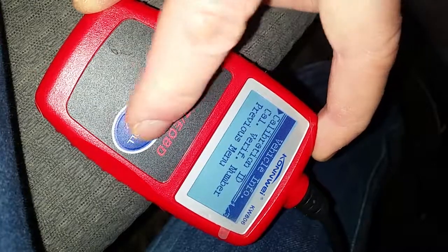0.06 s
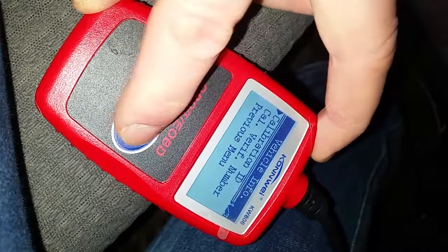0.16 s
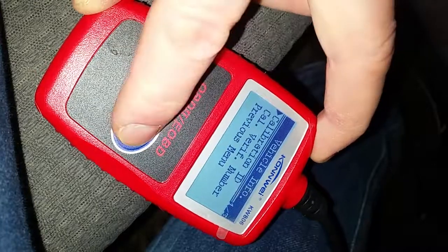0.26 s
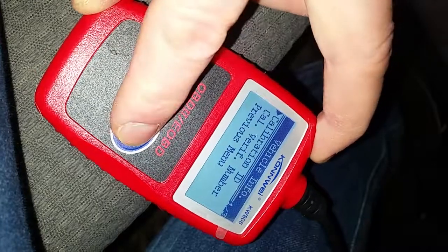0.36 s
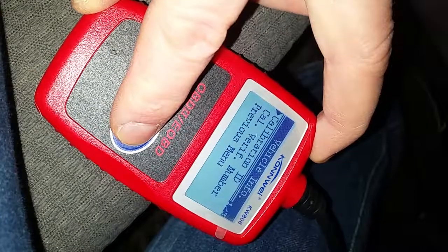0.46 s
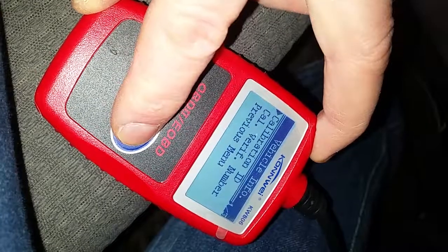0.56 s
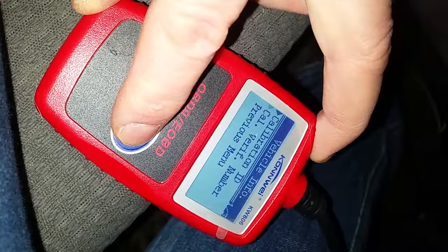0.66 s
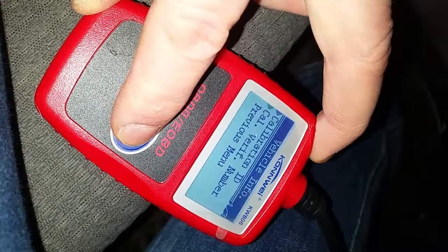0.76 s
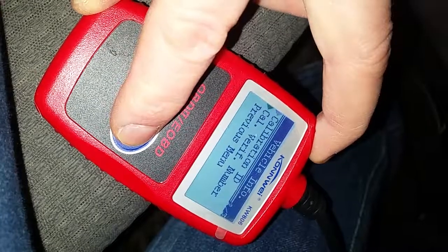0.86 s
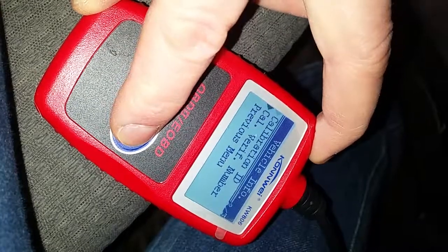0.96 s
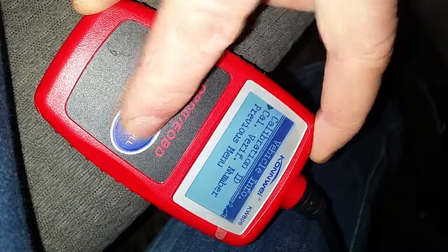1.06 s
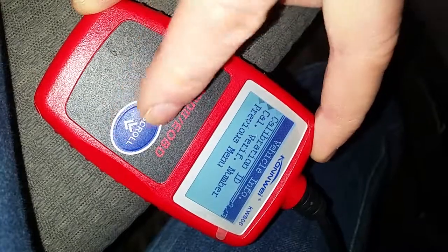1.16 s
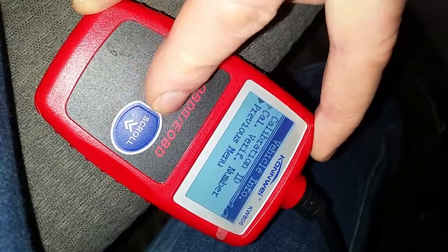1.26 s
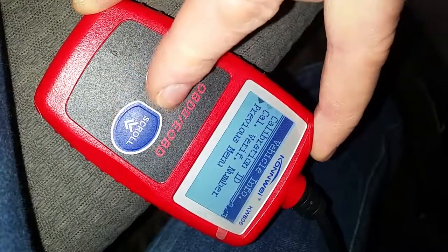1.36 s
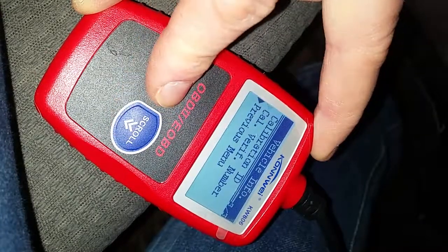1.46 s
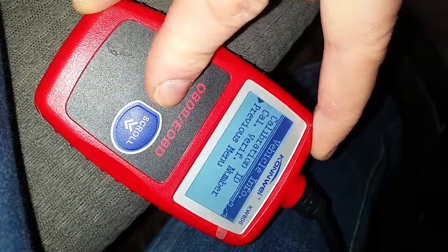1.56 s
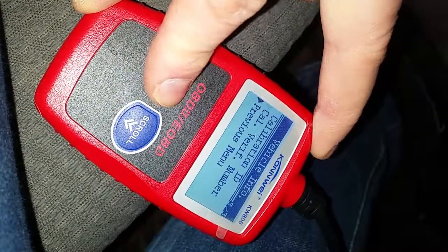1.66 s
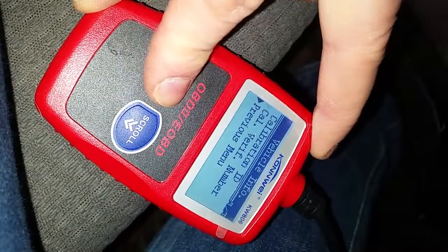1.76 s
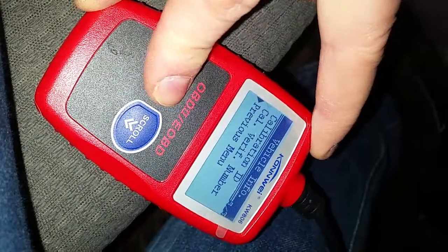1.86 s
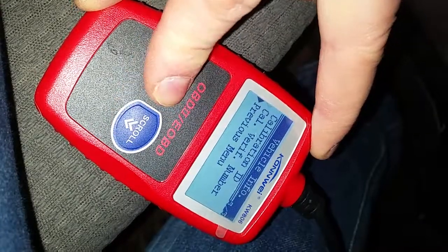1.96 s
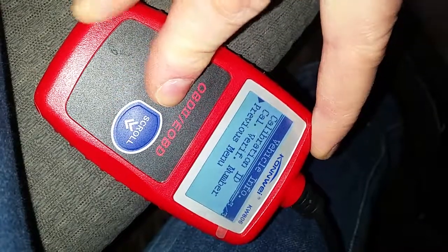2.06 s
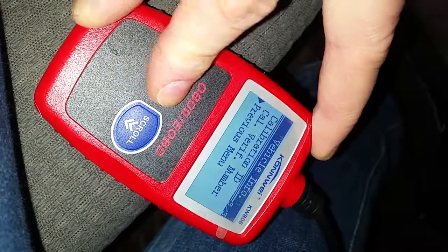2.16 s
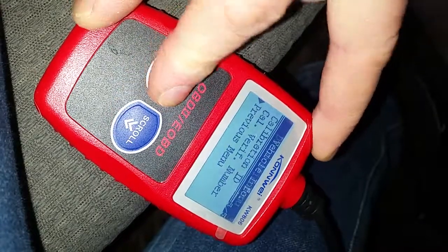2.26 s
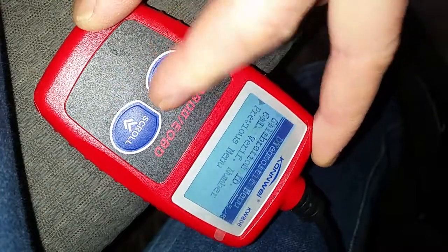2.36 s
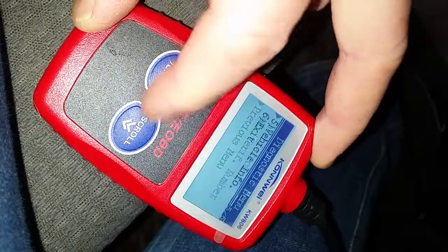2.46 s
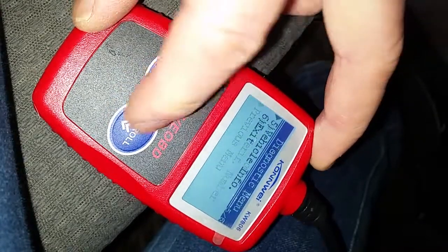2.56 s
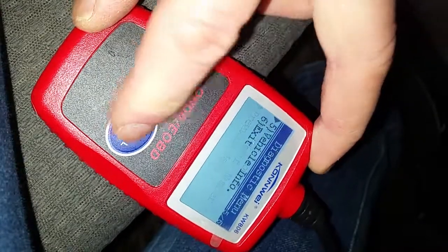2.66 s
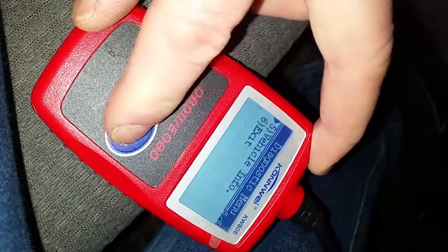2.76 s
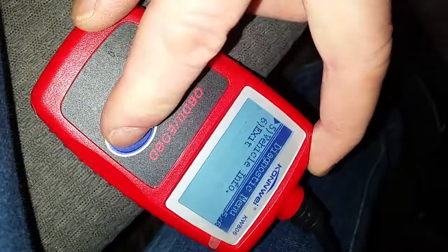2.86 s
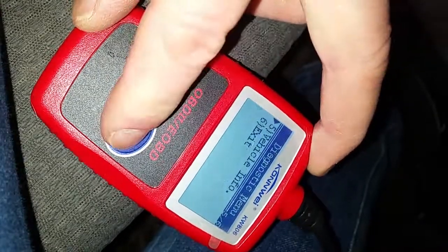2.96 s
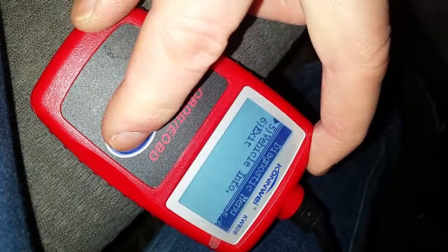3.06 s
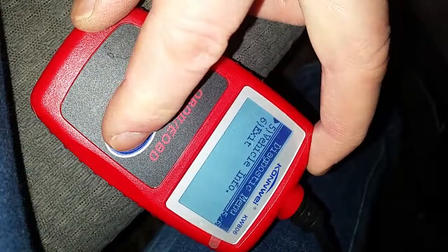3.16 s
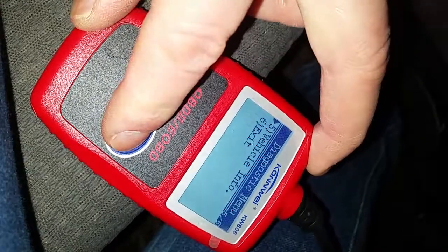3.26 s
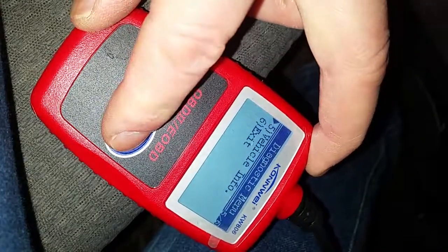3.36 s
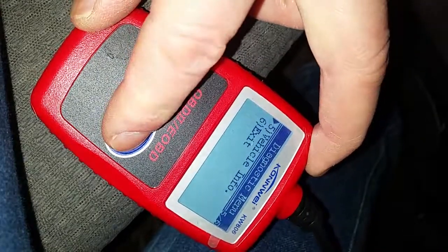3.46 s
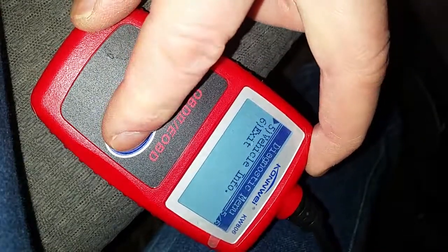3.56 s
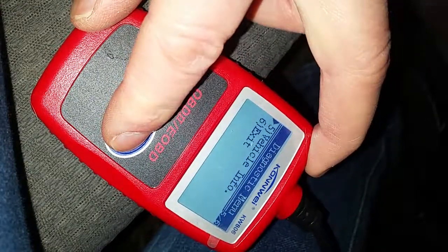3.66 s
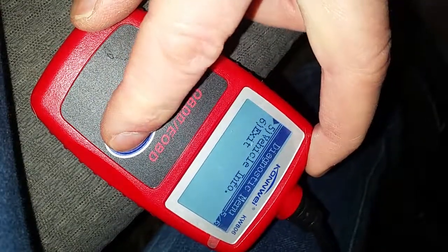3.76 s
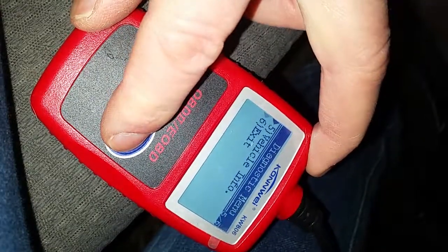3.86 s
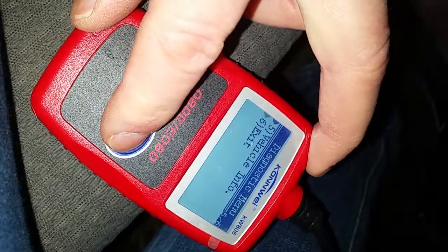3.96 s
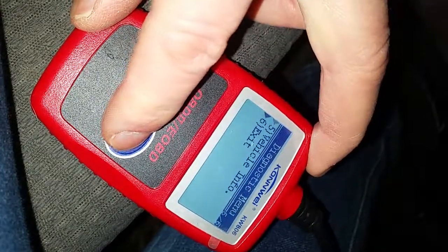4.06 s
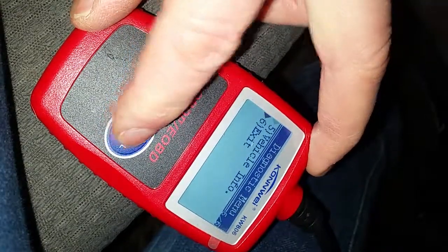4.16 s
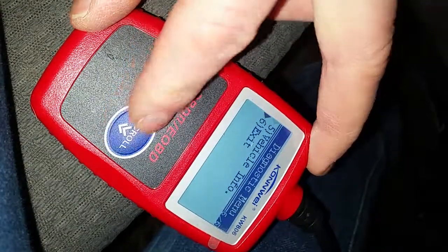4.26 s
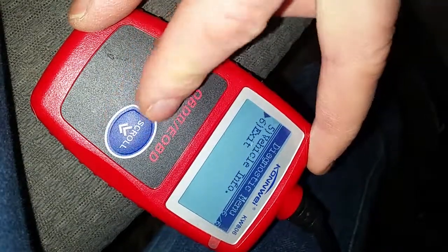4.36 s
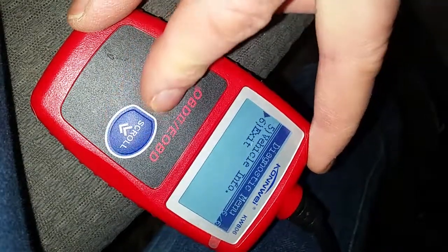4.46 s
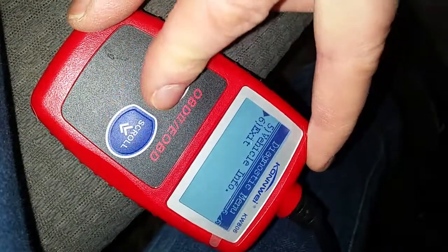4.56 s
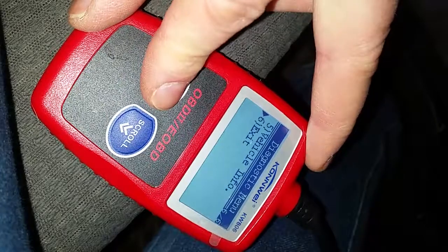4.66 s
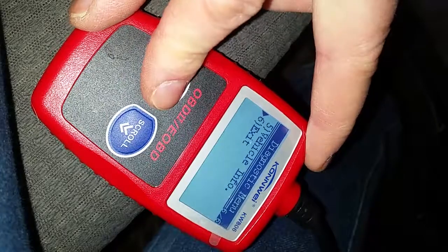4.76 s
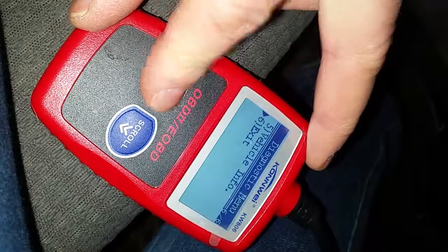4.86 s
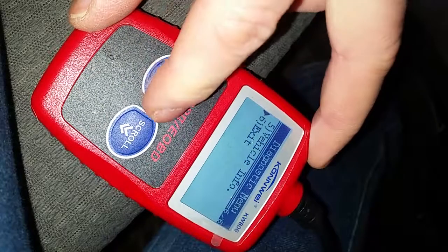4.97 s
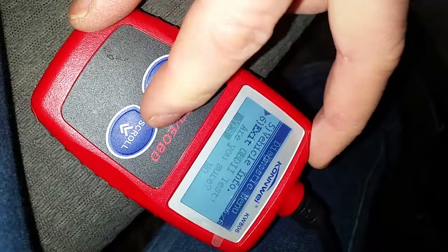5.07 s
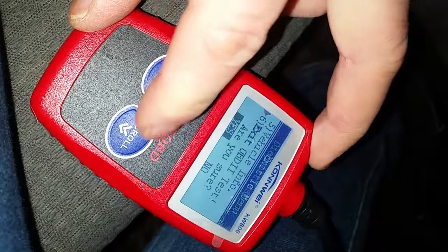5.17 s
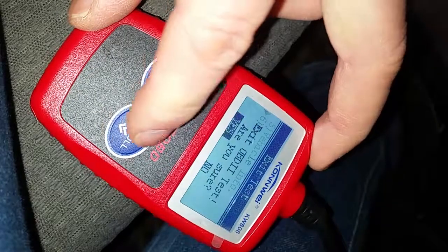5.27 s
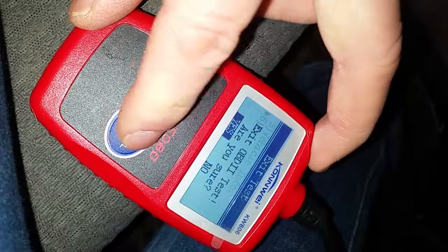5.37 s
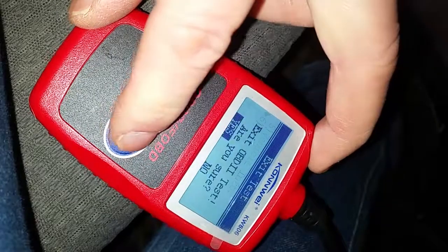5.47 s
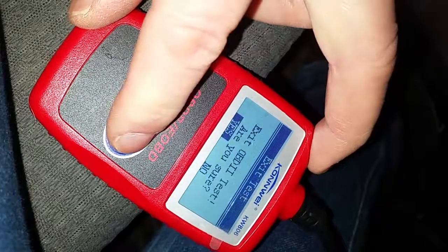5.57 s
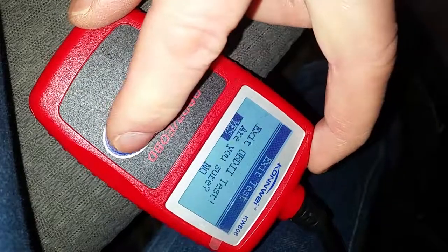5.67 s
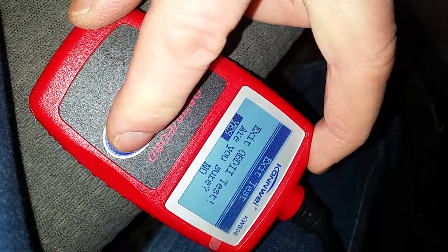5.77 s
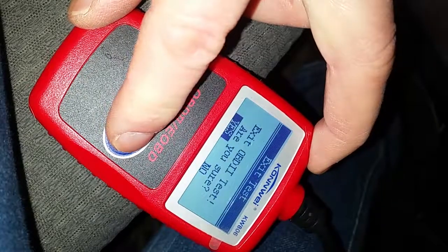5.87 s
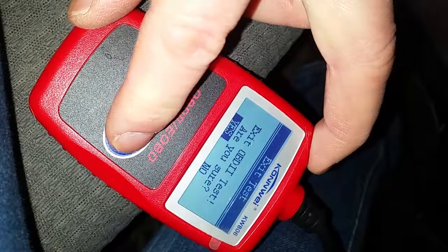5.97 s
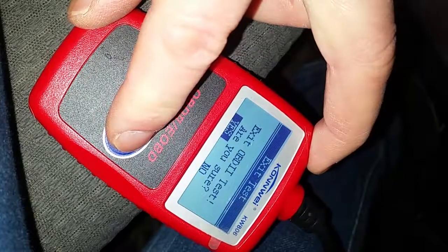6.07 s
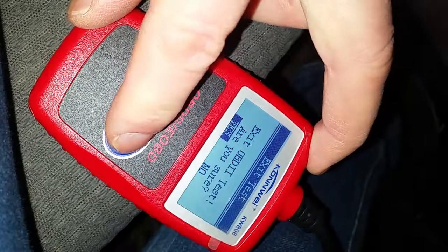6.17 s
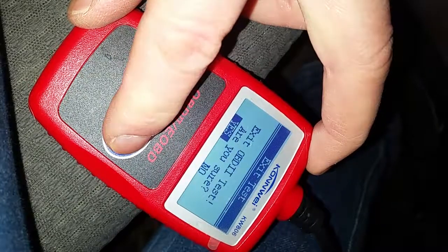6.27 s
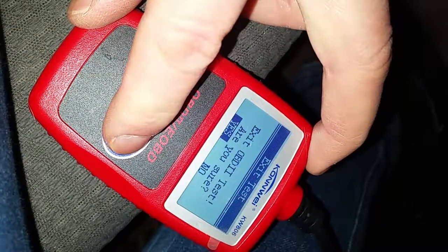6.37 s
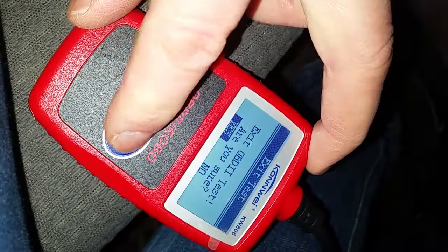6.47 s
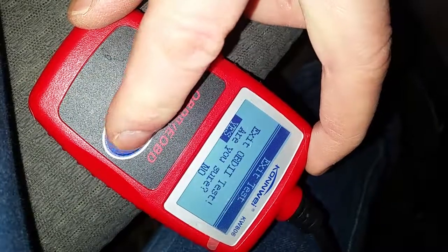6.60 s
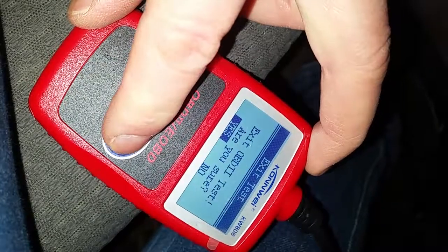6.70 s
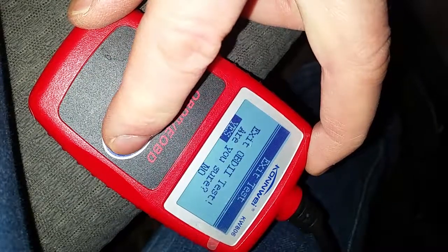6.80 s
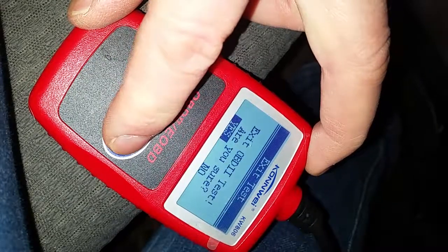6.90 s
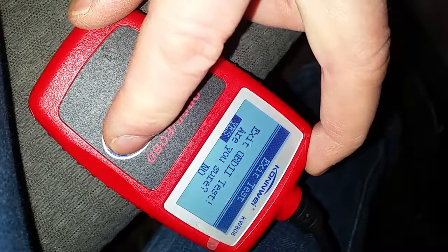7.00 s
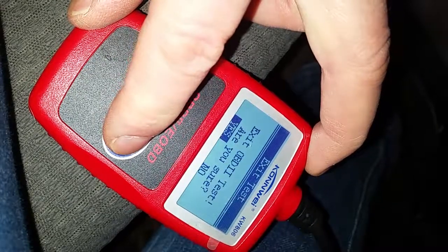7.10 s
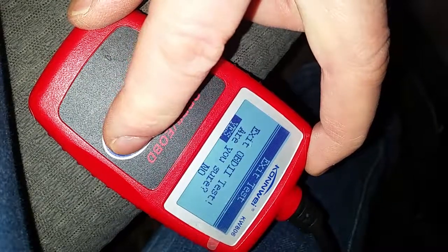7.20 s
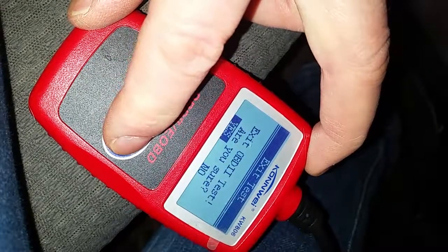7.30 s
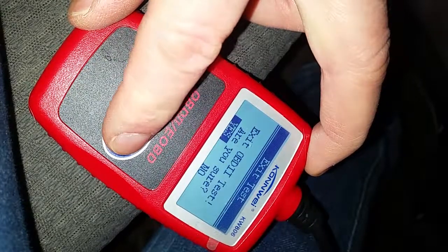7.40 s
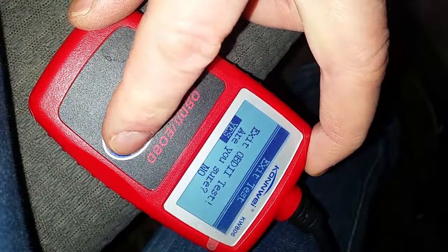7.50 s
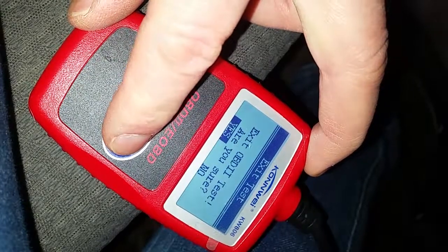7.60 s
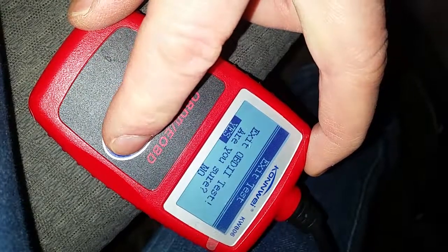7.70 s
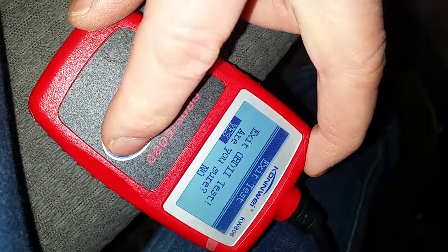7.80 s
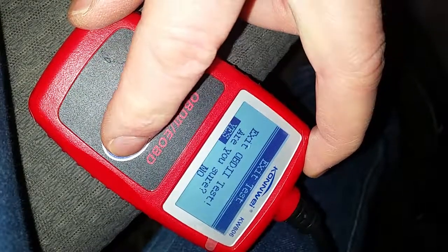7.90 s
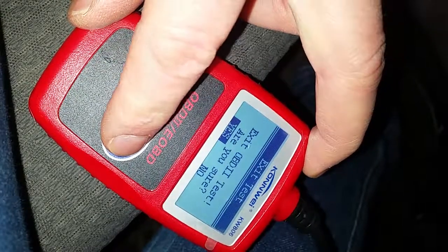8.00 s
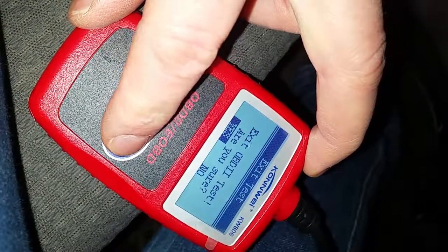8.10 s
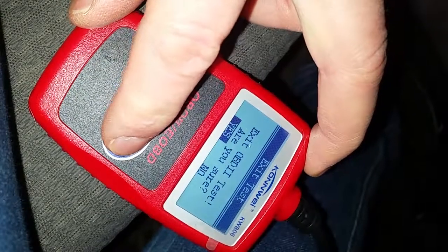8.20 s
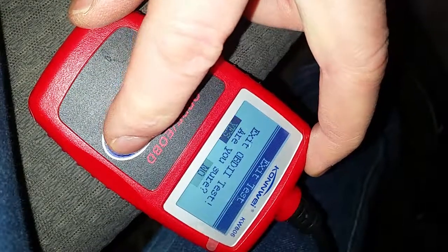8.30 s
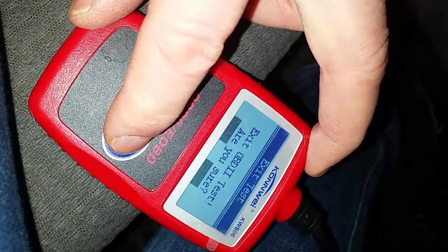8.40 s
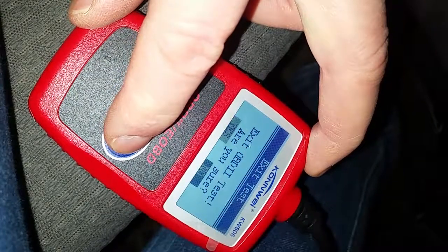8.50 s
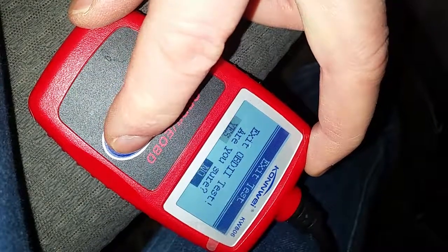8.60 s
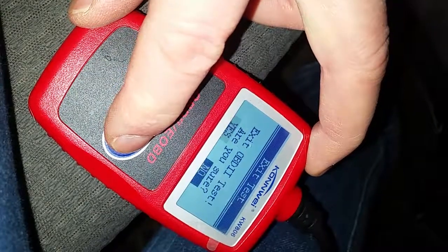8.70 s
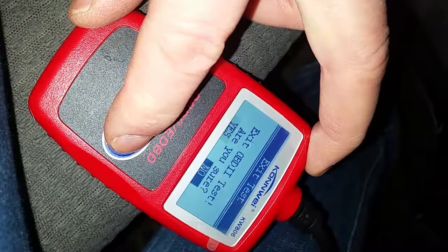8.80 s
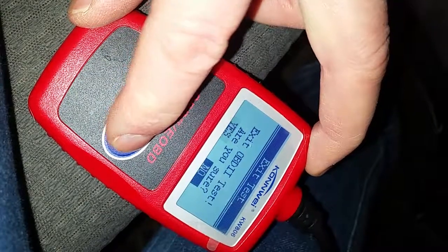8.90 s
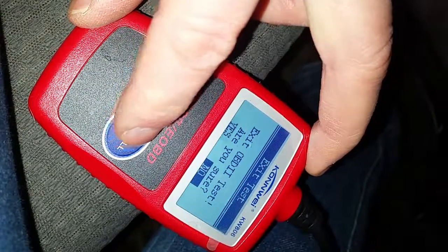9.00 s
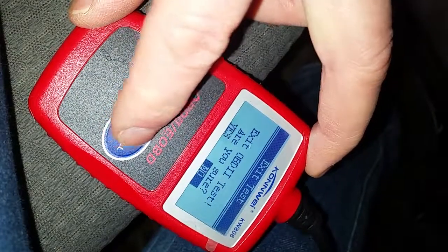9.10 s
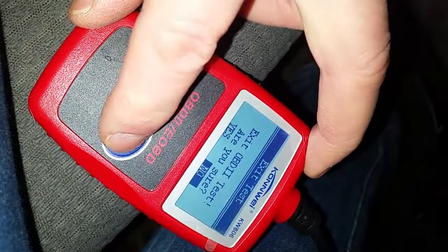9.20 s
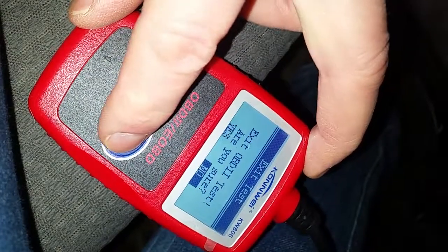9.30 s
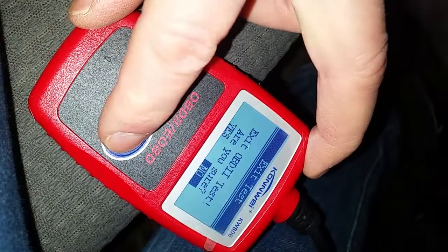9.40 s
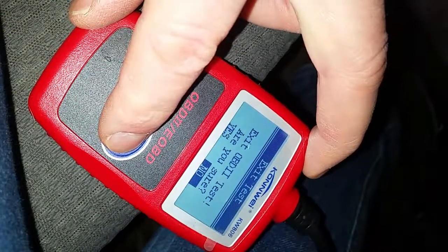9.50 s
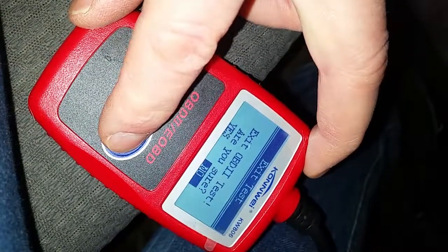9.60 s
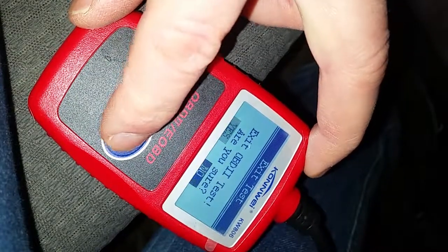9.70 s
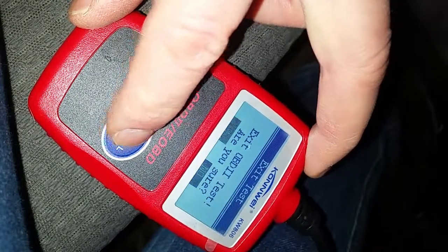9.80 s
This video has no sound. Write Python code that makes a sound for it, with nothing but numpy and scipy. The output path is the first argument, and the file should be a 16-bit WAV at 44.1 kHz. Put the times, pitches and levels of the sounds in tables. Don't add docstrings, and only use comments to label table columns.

```python
import sys
import numpy as np
from scipy import signal
from scipy.fft import rfft, irfft
from scipy.io import wavfile
from scipy.ndimage import uniform_filter1d

SR = 44100
rng = np.random.default_rng(int(sys.argv[2]) if len(sys.argv) > 2 else 0)


def attenuation_scalar(level_db):
    decades = np.asarray(level_db, float) / 20
    return 10 ** decades


def unload_audio(sound):
    columns = np.transpose(np.atleast_2d(sound))
    steps = np.round(np.clip(columns, -1, 1) * 32767)
    wavfile.write(sys.argv[1], SR, steps.astype(np.int16))


N = 434385

PRESS_TIMES = [.4030, .9495, 1.8686, 3.6550, 4.7609, 7.9913, 9.4878]
RELEASE_TIMES = [.6547, 1.1159, 2.1423, 3.8823, 4.9462, 8.2441, 9.6819]
BUTTON = [0, 0, 1, 0, 1, 0, 0]
# (knock [dB], lid ring [dB], tick [dB], snap [dB])
PRESS_LEVELS = [
    (-26, 0, -46, -32),
    (-27.5, 1, -45.5, -33),
    (-27.5, 3.5, -45, -32),
    (-25, 1.5, -46, -34),
    (-26, 3, -46, -33),
    (-28.5, 0.5, -48, -32),
    (-24.5, -1, -48.5, -33.5),
]
# (knock [dB], lid ring [dB], tick [dB], snap [dB])
RELEASE_LEVELS = [
    (-20.5, 1.5, -41, -50),
    (-21.5, 2.5, -39, -45),
    (-21.5, 3.5, -41, -46.5),
    (-20, 1, -43, -50.5),
    (-19, 1.5, -39, -41),
    (-21, 0, -40, -44.5),
    (-19.5, 0, -39.5, -46.5),
]
# (frequency [Hz], t60 [ms], signed swing left, signed swing right)
CASE_MODES = [(92, 42, .48, .37), (217, 33, -.41, -.35), (362, 16.2, -.57, -.54), (540, 36, -.02, -.1),
              (574, 17.4, .17, .23), (775, 13.5, .23, .31), (1185, 10.5, -.93, -.73), (1472, 24, .47, .12),
              (1704, 12.8, .1, .07)]
# (delay [ms], signed gain left, signed gain right)
BOUNCES = [(0, 1, 1), (.77, -.97, -1.16), (1.88, -.26, -.33), (6, .02, .09)]
# (frequency [Hz], left [dB], right [dB])
TICK_COLOUR = [(1000, -52.5, -47), (2090, -31, -14), (2570, -22.5, -10), (3136, -14, -10),
               (3430, -7.5, -3.5), (4060, 0, -10.5), (5010, 3, -4), (5600, -19, -13.5), (6200, -1.5, -19),
               (7040, -15.5, -14.5), (8100, -24, -25.5)]
# (frequency [Hz], left [dB], right [dB])
SNAP_COLOUR = [(5980, -12, -24.5), (8100, -11.5, -7), (8600, -8, -5), (9600, -34, -6.5), (11630, -8.5, -3),
               (13350, -4, -3), (14160, -15.5, 6.5), (15260, -14, 11), (16540, -12, -8),
               (17100, -30.5, -19.5), (19600, -51, -44)]
# (frequency [Hz], left [dB], right [dB])
WASH_COLOUR = [(150, -16, -13.5), (400, -4, -5), (802, 11.5, -2), (1250, -2, -11), (1470, -10, -4),
               (2000, -25.5, -9), (2600, -33, -34.5)]
# (time [s], knock [dB], thud [dB], thud [Hz], tick [dB])
TAPS = [(0.3242, -42.5, -37.5, 200, -70), (1.6415, -38, -28, 167, -59), (1.6593, -60, -30, 125, -95),
        (1.669, -47, -35, 185, -63), (1.6866, -48, -28.5, 165, -67), (1.804, -56, -58, 200, -67),
        (2.4442, -53, -43, 200, -67), (3.3592, -46.5, -46, 260, -78), (4.076, -64, -42.5, 220, -95),
        (4.812, -46, -58, 200, -90), (4.9237, -44, -56, 200, -56), (5.894, -68, -45, 220, -100),
        (9.3373, -41, -52, 200, -71), (9.369, -62, -59, 200, -65), (9.3748, -62, -62, 200, -67),
        (9.4074, -52, -33.5, 335, -99)]
# (fastest at [s], speeds up for [s], slows down for [s], scrape [dB], fine rustle [dB])
STROKES = [(.06, 0.11, 0.24, -72, -94), (1.15, .03, 0.1, -65, -76.5), (1.27, .1, .22, -62.5, -85.5),
           (2.0, .1, 0.11, -76, -95), (2.28, 0.11, 0.15, -73, -88), (2.44, 0.15, 0.23, -69, -83.5),
           (4.36, 0.12, 0.11, -64, -85.5), (4.52, 0.18, 0.062, -62.5, -90), (4.7, 0.13, 0.045, -68, -80),
           (4.98, 0.034, 0.048, -58.5, -75.5), (5.05, .05, 0.27, -68, -83), (9.3, .1, 0.11, -75, -101)]
# (frequency [Hz], left [dB], right [dB])
SCRAPE_COLOUR = [(200, -12, -17.5), (355, -7, -9), (555, -2, -0.5), (784, -0.5, 2), (970, -8.5, -6.5),
                 (1150, -15, -17), (1520, -37, -31.5)]
# (frequency [Hz], left [dB], right [dB])
SQUEAK_COLOUR = [(1000, -20, -20), (1350, -5, -6), (1800, 0, -2), (2050, -6, -7), (2300, -20, -20),
                 (3000, -36, -36)]
# (frequency [Hz], left [dB], right [dB])
RUSTLE_COLOUR = [(2500, -9.5, 4), (4500, 11, 6.5), (5900, 0.5, -2.5), (7500, -5.5, -7), (9000, -5.5, 4.5),
                 (11000, 1.5, 7), (15100, 1.5, 14.5), (15900, -2.5, 8)]
# (time [s], rumble [dB])
SWELL = [(0.0, -51.5), (1.73, -51.5), (2.25, -49.5), (2.88, -53), (3.04, -52), (3.9, -52), (4.99, -48.5),
         (5.35, -52.5), (6.36, -51.5), (7.24, -52), (7.46, -51), (8.97, -52), (9.68, -49), (9.85, -49.5)]
# (frequency [Hz], left [dB per Hz], right [dB per Hz])
RUMBLE_COLOUR = [(12, -19.5, -24), (27, -14.5, -16.5), (42, -2, -1), (53.6, 0.5, 2), (69.2, -3.5, -0.5),
                 (98, 3.5, 0.5), (125, -3, 2), (139, -5.5, -7), (181, -7, -4), (227, -6.5, -12),
                 (277, -14, -9.5), (487, -22, -28.5), (830, -39, -55), (2000, -65.5, -65.5)]
# (frequency [Hz], left [dB], right [dB])
MOTOR_PARTIALS = [(96.94, -61.5, -61.5), (213, -53, -54.5), (387.3, -82, -74), (428, -94, -71.5),
                  (574, -81, -103.5), (645.5, -90, -77.5), (776, -86, -79)]
# (frequency [Hz], left [dB per Hz], right [dB per Hz])
HISS_COLOUR = [(300, -102, -102), (636, -104, -103), (1370, -111, -110), (2290, -118, -118),
               (3030, -114, -108), (3783, -107, -91), (4657, -112, -102), (5630, -127, -133),
               (6650, -133, -133), (10500, -132, -131), (13450, -121, -113), (14800, -112, -102),
               (15000, -112.5, -103), (15760, -114, -104.5)]

LEFT_LAG = 7
AFTER = np.arange(4096) / SR


def buttons():
    out = np.zeros((2, N))
    tick_grain, snap_grain, wash_grain = (pair(1.0, size=len(AFTER)) for _ in range(3))
    wash = unit(colour(wash_grain, WASH_COLOUR)) * fade(57, 4.0)
    presses = (PRESS_TIMES, PRESS_LEVELS, (1.4, -1.5), -1)
    releases = (RELEASE_TIMES, RELEASE_LEVELS, (-0.24, -4.5), 1)
    for times, levels, weights_db, direction in (presses, releases):
        for s, button, (knock_db, ring_db, tick_db, snap_db) in zip(times, BUTTON, levels):
            s -= .00022
            body = knock(weights_db[button], ring_db, contact_ms=0.035) + attenuation_scalar(-26.5) * wash
            tick = crack(TICK_COLOUR, tick_grain, rebound=1.6, t60_ms=8.3, echo_db=-12.5,
                         tail_db=-13.5, tail_t60_ms=80)
            snap = crack(SNAP_COLOUR, snap_grain, rebound=0.39, t60_ms=6.6, echo_db=-14.5,
                         tail_db=-18.5, tail_t60_ms=70)
            add(out, s, direction * attenuation_scalar(knock_db + 1.5) * body)
            add(out, s, attenuation_scalar(tick_db + 4.5) * tick)
            add(out, s - .0001, attenuation_scalar(snap_db + 4.5) * snap)
    return out


def knock(weight_db, ring_db, contact_ms):
    out = np.zeros((2, len(AFTER)))
    for hz, t60_ms, *swing in CASE_MODES:
        gain = np.array(swing)[:, None] * attenuation_scalar(weight_db * (hz < 400) + ring_db * (hz > 1400))
        for ms, *bounce in BOUNCES:
            mode = fade(t60_ms, ms) * np.sin(2 * np.pi * hz * (AFTER - ms / 1000))
            out += gain * np.array(bounce)[:, None] * mode
    push = fade(np.log(1000) * np.clip(contact_ms, .02, 3))[:512]
    return signal.lfilter(push / push.sum(), 1, out)


def crack(table, grain, rebound, t60_ms, echo_db, tail_db, tail_t60_ms):
    noise = grain + 0.67 * pair(0.82, size=len(AFTER))
    burst = fade(t60_ms) + rebound * fade(t60_ms, .6)
    echoes = fade(2 * t60_ms, 2.6) + .6 * fade(2 * t60_ms, 4.8)
    tail = fade(tail_t60_ms)
    push = noise * (burst + attenuation_scalar(echo_db) * echoes + attenuation_scalar(tail_db) * tail)
    push[[0, 1], [8 + LEFT_LAG, 8]] += 7
    return unit(colour(push, table, causal=True)) * attenuation_scalar(-17)


def thumb():
    return taps() + slides()


def taps():
    out = np.zeros((2, N))
    soft_ms_per_db = .006
    for s, knock_db, thud_db, thud_hz, tick_db in TAPS:
        body = knock(0, 0, contact_ms=soft_ms_per_db * (knock_db - tick_db))
        thud = -(fade(35) - fade(2.6)) * np.sin(2 * np.pi * thud_hz * AFTER)
        tick = unit(colour(pair(0.72, size=len(AFTER)), RUSTLE_COLOUR)) * fade(15)
        add(out, s, attenuation_scalar(knock_db) * body + attenuation_scalar(thud_db) * thud)
        add(out, s, attenuation_scalar(tick_db + 2.5) * tick)
    return out


def slides():
    scrape_db, rustle_db = drag()
    squeak_db = -79 + .6 * (scrape_db + 67.5) + .45 * (rustle_db + 86)
    slips = attenuation_scalar(2.5 * walk(120) + 2.5 * walk(25))
    scrape = unit(colour(pair(0.18) * slips, SCRAPE_COLOUR)) * attenuation_scalar(scrape_db + 1.1)
    squeak = unit(colour(pair(0.74) * slips, SQUEAK_COLOUR)) * attenuation_scalar(squeak_db + 2.5)
    rustle = unit(colour(pair(0.18) * slips, RUSTLE_COLOUR)) * attenuation_scalar(rustle_db + 10.5)
    return scrape + squeak + rustle


def drag():
    # (scrape [dB], fine rustle [dB])
    rest_db, after_press_db, after_release_db = (-80.5, -103), (-72.5, -77.5), (-71, -83)
    creep_db_per_s = 70.5
    t = np.arange(N) / SR
    power = np.outer(attenuation_scalar(rest_db) ** 2, np.ones(N))
    for s, rise_s, fall_s, *stroke_db in STROKES:
        speed = np.exp(-((t - s) / np.where(t < s, rise_s, fall_s)) ** 2)
        power += np.outer(attenuation_scalar(stroke_db) ** 2, speed ** 2)
    for times, after_db in ((PRESS_TIMES, after_press_db), (RELEASE_TIMES, after_release_db)):
        for s in times:
            creep = (t > s) * attenuation_scalar(-creep_db_per_s * np.abs(t - s))
            power += np.outer(attenuation_scalar(after_db) ** 2, creep ** 2)
    return 10 * np.log10(power)


def motor():
    turning = np.cumsum(1 + 0.00069 * walk(1.51)) / SR
    out = np.zeros((2, N))
    for hz, *db in MOTOR_PARTIALS:
        level = np.sqrt(2) * attenuation_scalar(np.array(db)[:, None] + 0.8 * walk(5))
        out += level * np.sin(2 * np.pi * (hz * turning + rng.random()))
    return out


def cabin():
    noise = pair(0.98) * attenuation_scalar(0.92 * walk(9))
    return unit(colour(noise, RUMBLE_COLOUR)) * attenuation_scalar(along(SWELL)[0] + 1.0)


def port_hiss():
    return colour(rng.standard_normal((2, N)), HISS_COLOUR) * np.sqrt(SR / 2)


def colour(x, table, causal=False):
    hz, *levels_db = np.transpose(table)
    size = x.shape[-1]
    at = np.log(np.maximum(np.fft.rfftfreq(size, 1 / SR), 1))
    gain = attenuation_scalar(np.array([np.interp(at, np.log(hz), db, right=db[-1] - 40) for db in levels_db]))
    if causal:
        fold = np.r_[1, 2 * np.ones(size // 2 - 1), 1, np.zeros(size // 2 - 1)]
        gain = np.exp(rfft(irfft(np.log(gain), size) * fold))
    return irfft(rfft(x) * gain, size)


def unit(x):
    return x / np.sqrt(np.mean(x ** 2))


def pair(likeness, size=N):
    mid, side = rng.standard_normal((2, size))
    share = np.clip(likeness, 0, 1)
    common = np.array([np.roll(mid, LEFT_LAG), mid])
    opposed = side * np.array([[1], [-1]])
    return np.sqrt(1 + share) * common + np.sqrt(1 - share) * opposed


def walk(rate):
    hold = int(SR / rate)
    steps = np.repeat(rng.standard_normal(N // hold + 1), hold)
    return uniform_filter1d(uniform_filter1d(steps, hold), hold)[:N]


def along(table):
    s, *columns = np.transpose(table)
    return [np.interp(np.arange(N) / SR, s, column) for column in columns]


def add(out, s, sound):
    i = int(s * SR)
    out[:, i:i + sound.shape[1]] += sound[:, :N - i]


def fade(t60_ms, late_ms=0.):
    t = AFTER - late_ms / 1000
    return (t >= 0) * np.exp(-np.log(1000) * 1000 * np.maximum(t, 0) / t60_ms)


def scene():
    return buttons() + thumb() + motor() + cabin()


def roll_off(x):
    return signal.sosfilt(signal.butter(12, 17150, fs=SR, output="sos"), x)


def record(dry):
    top_cut = signal.butter(12, 16850, fs=SR, output="sos")
    mix = signal.sosfiltfilt(top_cut, dry) + port_hiss() - .0004
    return roll_off(mix)


dry = scene()
out = record(dry)
unload_audio(out)
```